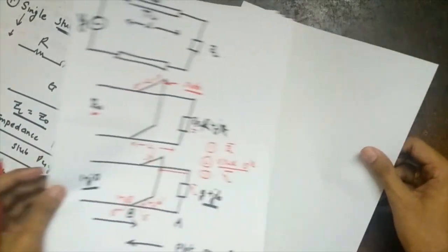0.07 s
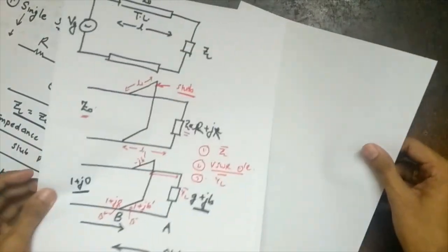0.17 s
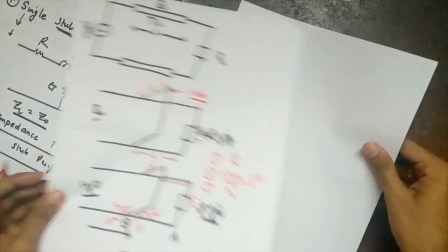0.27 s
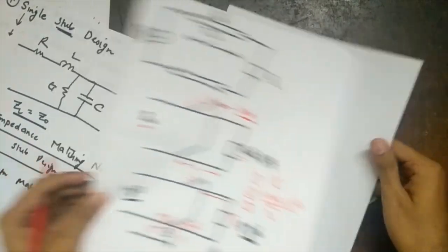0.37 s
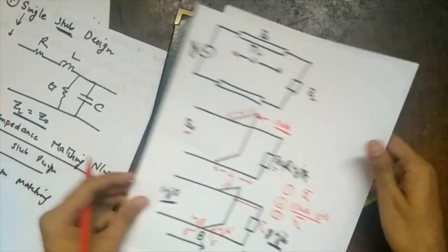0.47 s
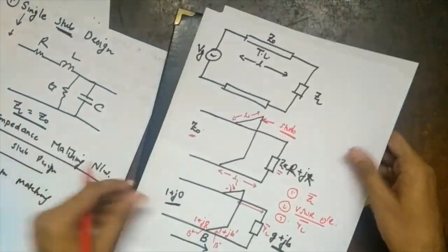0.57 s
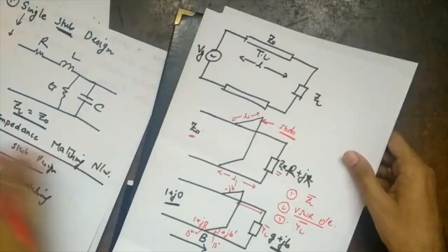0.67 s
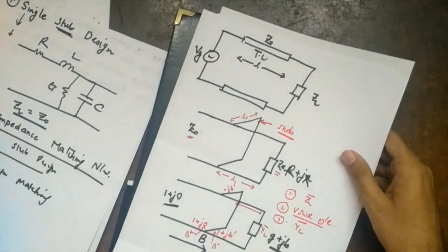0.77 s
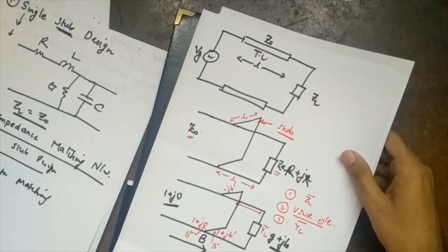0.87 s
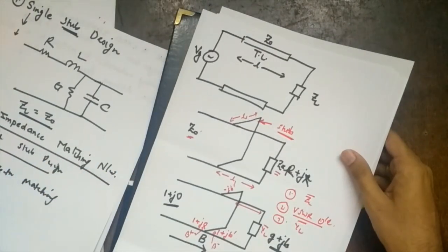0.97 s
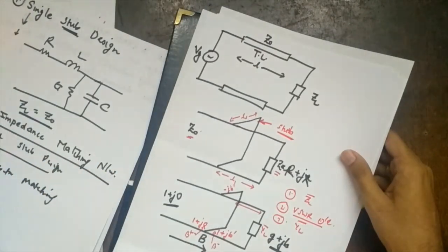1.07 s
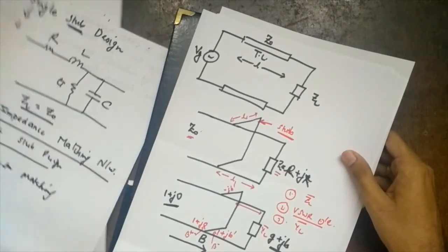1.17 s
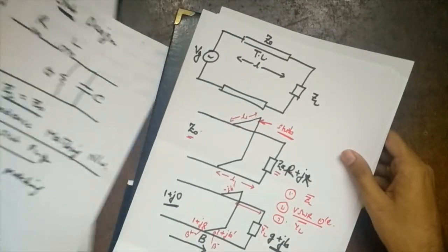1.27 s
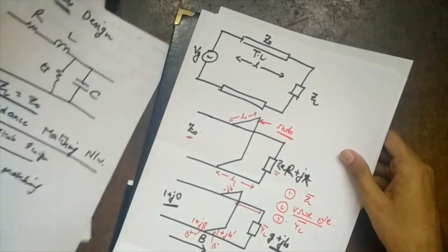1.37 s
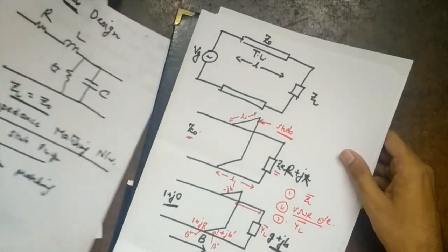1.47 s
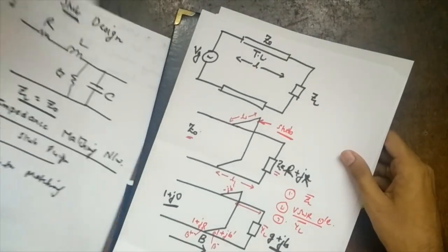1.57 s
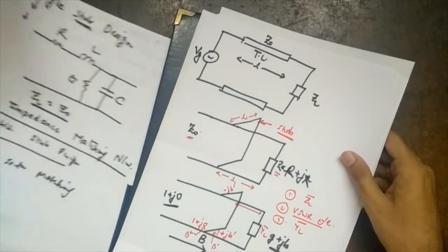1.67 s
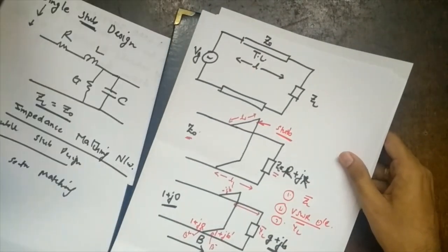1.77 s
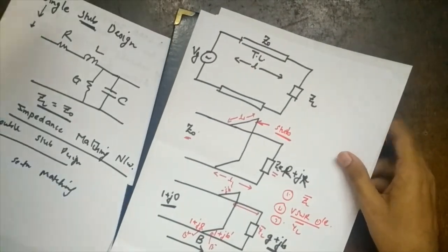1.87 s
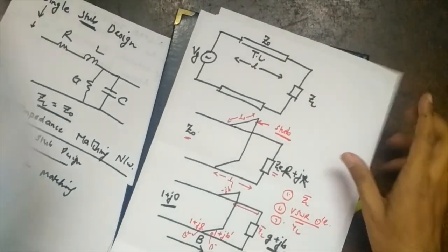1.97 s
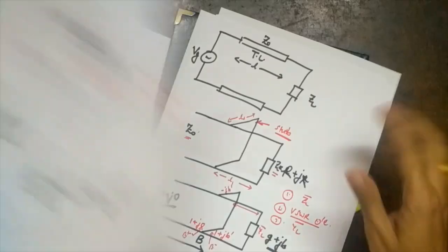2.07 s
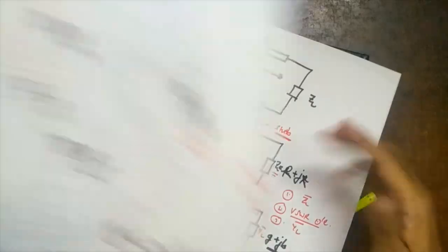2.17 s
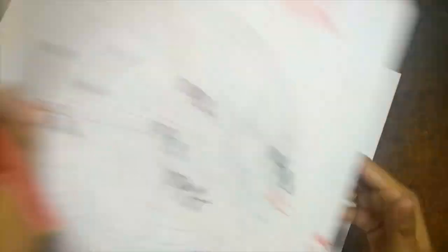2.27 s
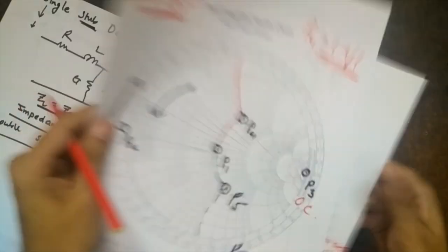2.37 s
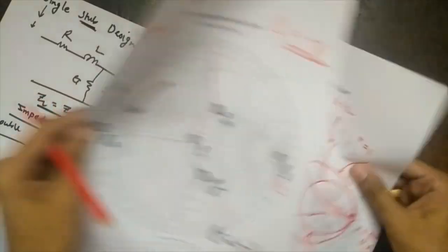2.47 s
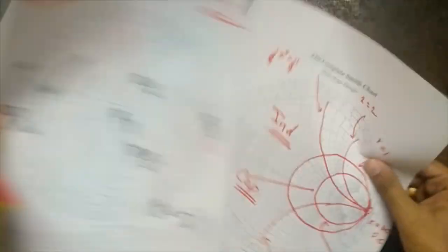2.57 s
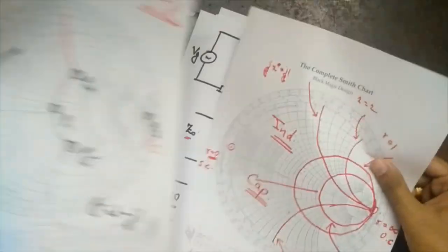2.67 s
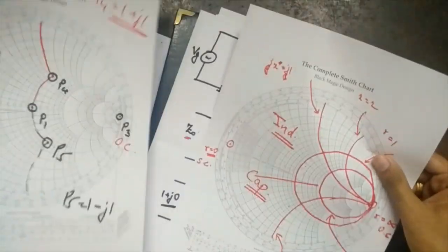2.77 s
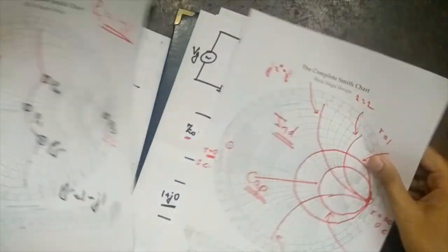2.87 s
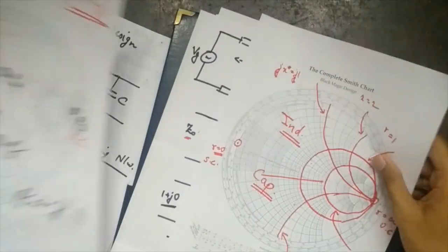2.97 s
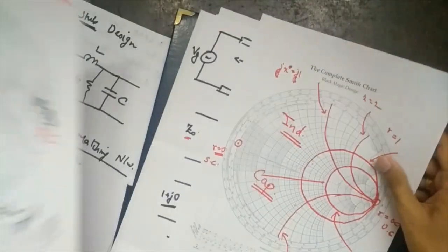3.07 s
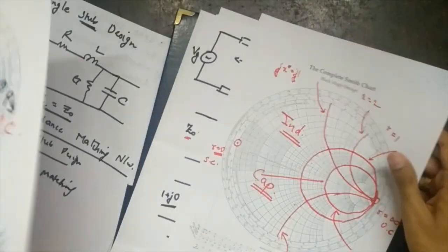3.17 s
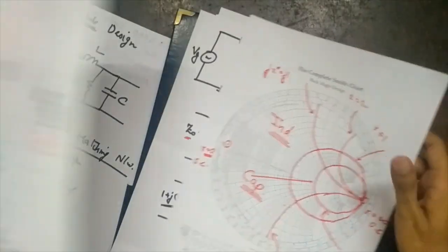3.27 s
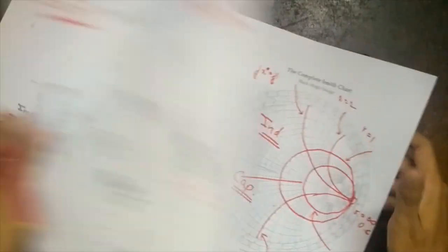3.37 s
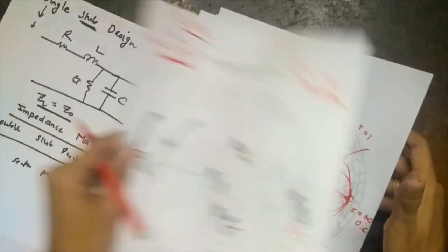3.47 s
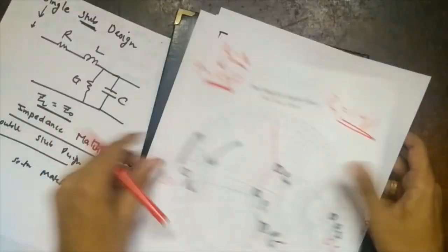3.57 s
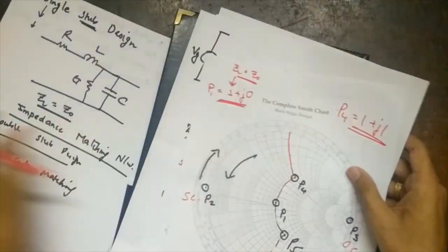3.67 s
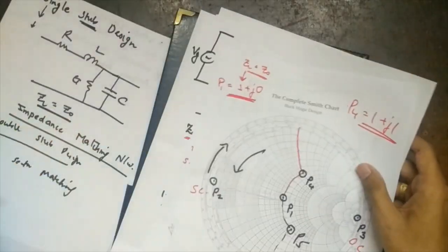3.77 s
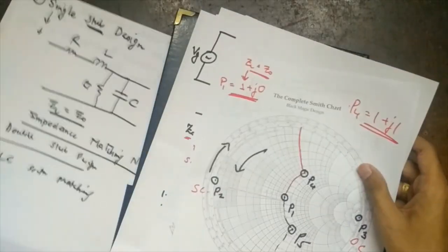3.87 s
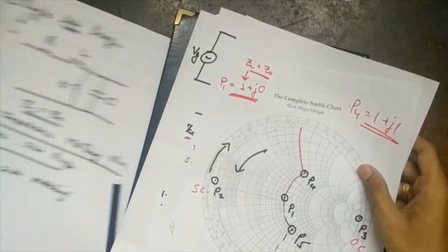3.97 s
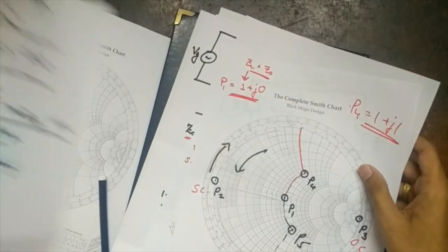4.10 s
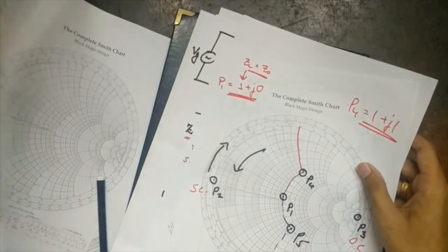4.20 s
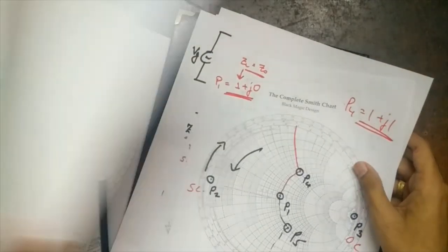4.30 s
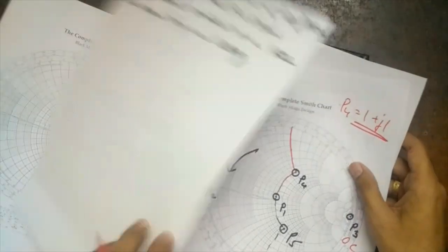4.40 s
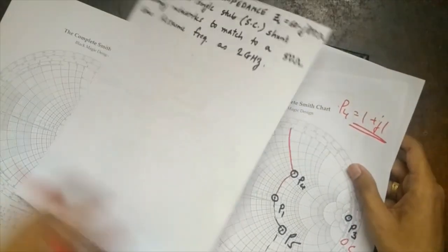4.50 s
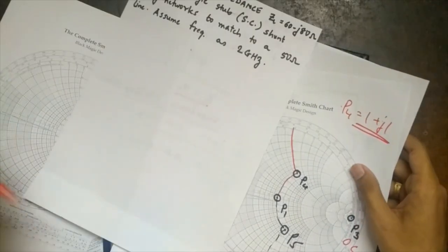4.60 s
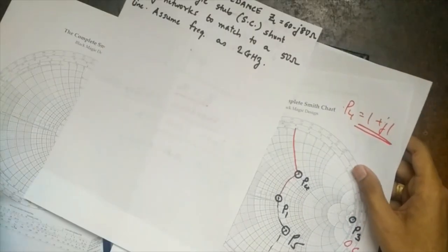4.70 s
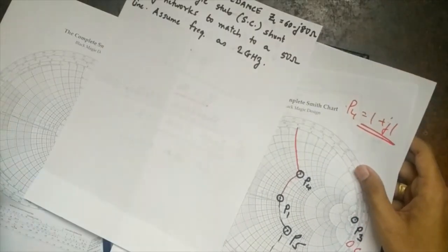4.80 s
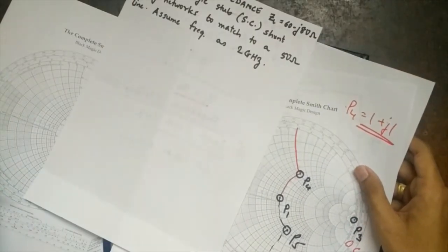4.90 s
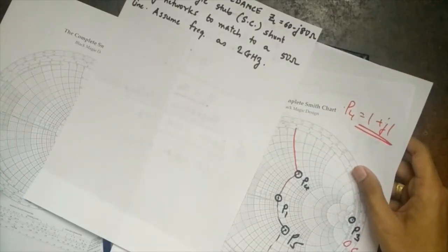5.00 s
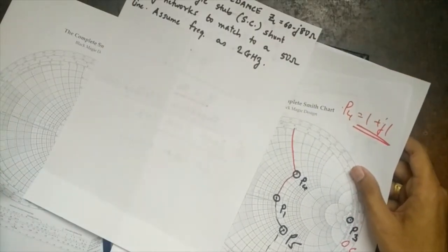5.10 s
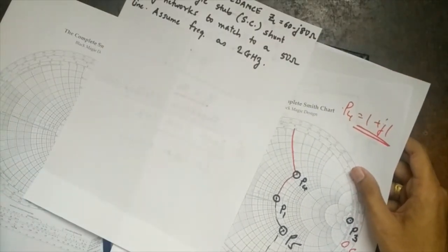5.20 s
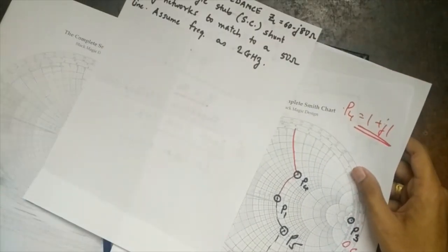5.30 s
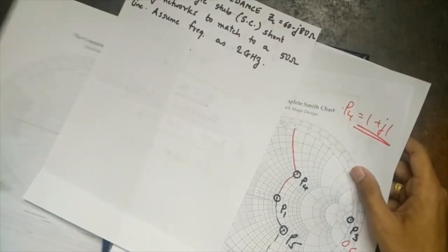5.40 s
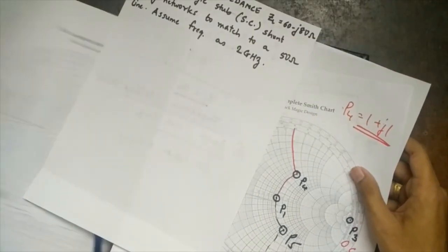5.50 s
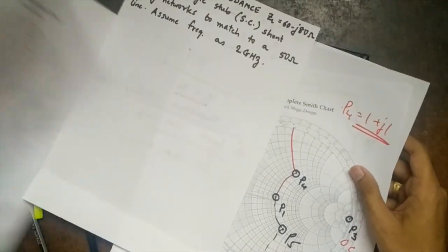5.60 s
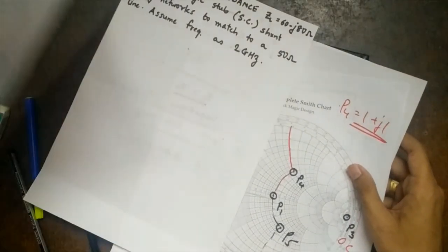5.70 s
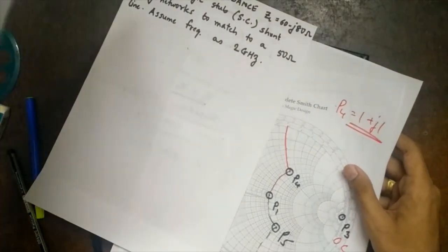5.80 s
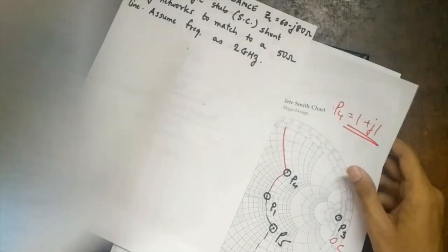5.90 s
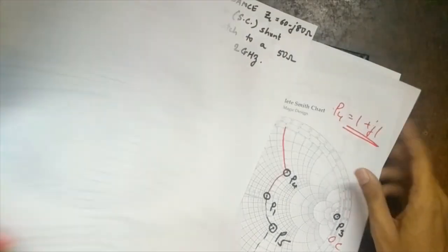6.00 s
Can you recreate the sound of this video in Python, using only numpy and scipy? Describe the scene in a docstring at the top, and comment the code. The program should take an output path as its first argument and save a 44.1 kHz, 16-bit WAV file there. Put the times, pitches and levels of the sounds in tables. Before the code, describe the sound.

Sheets of paper slide off a stack in a string of short, bright, hissing swishes, with small crisp snaps as they buckle. Near the middle a sheet flaps as it is turned over, and fingertips rasp faintly on the paper. A sharper pop follows later, then a soft thump on the desk amid more sliding. One close microphone hears it in a small quiet room with faint background noise.

```python
"""Sheets of paper slide off a stack, are turned over and are laid on a desk in a small quiet room.
Sliding friction, the sum of countless slips of fibres, gives a hiss that brightens with speed.
Buckling paper snaps and pops, a swung sheet flaps, and fingertips rasp by stick and slip.
The desk thumps softly twice, faintly early on and louder near the end.
One close microphone hears it all over faint room noise."""
import sys
import numpy as np
from scipy import signal
from scipy.fft import rfft, irfft
from scipy.io import wavfile
from scipy.ndimage import uniform_filter1d

SR = 44100
rng = np.random.default_rng(int(sys.argv[2]) if len(sys.argv) > 2 else 0)


def put_to_file(sound):
    """Save the sound as 16-bit audio at rate SR, in the file named by the first command-line argument."""
    columns = np.atleast_2d(sound).T  # one column per channel
    safe = np.clip(columns, -1, 1)
    whole_steps = np.round(safe * 32767)
    wavfile.write(sys.argv[1], SR, whole_steps.astype(np.int16))


N = 266805
TIME = np.arange(N) / SR


def sliding(judder_db=1.34):
    """Sliding friction radiates broadband noise: one band at low speed, the top treble too when fast."""
    # Spectra of the four parts of the friction noise: frequency_hz, relative_db
    hiss_spectrum = [(1500, -43), (2600, -43), (3300, -12), (4150, -10.5), (4750, -12), (5250, 1),
                     (5750, 0), (6600, -2.5), (7500, -6.5), (8200, -14), (9500, -14.5), (11000, -31),
                     (12500, -27.5), (15000, -36)]
    sizzle_spectrum = [(3000, -21), (5000, -8), (6300, -11), (7500, 3.5), (8600, 3.5), (9500, 1),
                       (11000, -3.5), (14000, -28)]
    treble_spectrum = [(6000, -19), (9000, -6), (9700, 1), (11300, -2.5), (12500, -4.5), (14000, -7),
                       (16000, -7)]
    rustle_spectrum = [(60, -35), (250, -16.5), (800, -17.5), (1300, 1.5), (1900, -1), (2500, 2),
                       (3100, 5.5), (4100, 1.5), (4750, -11.5), (8000, -25.5)]
    hiss_level, sizzle_level, treble_level, rustle_level = strokes()
    grain = flicker(fibres(per_s=2200, share=0.18), depth_db=3, patch_hz=200, patch_s=0.087)
    fine = flicker(fibres(per_s=5500, share=0.2, spread_db=-1.5), depth_db=4, patch_hz=220, patch_s=0.031)
    crackle = flicker(fibres(per_s=1700, share=0.45), depth_db=7.5, patch_hz=250, patch_s=0.04)
    fizz = flicker(rng.standard_normal(N), depth_db=3, patch_hz=220, patch_s=0.045)
    hiss = amp(-1.5) * hiss_level * colour(grain, hiss_spectrum)
    sizzle = amp(-0.5) * sizzle_level * colour(fizz, sizzle_spectrum)
    treble = amp(-0.5) * treble_level * colour(fine, treble_spectrum)
    rustle = amp(-8) * rustle_level * colour(crackle, rustle_spectrum)
    return amp(judder_db * wander(36.65)) * (hiss + sizzle + treble + rustle)


def strokes(sag_db_per_s=17, coast_db=27, treble_exponent=1.375, rustle_exponent=0.89):
    """Friction noise follows power laws of speed; overlapping strokes are incoherent and add in power."""
    # Sheet strokes, plus faint hiss in the pauses; treble and rustle are relative to the hiss:
    # start_s, rise_s, glide_s, coast_s, hiss_db, treble_db, rustle_db
    hisses = [(0, 0.0017, 0.058, 0.38, -44.5, -0.5, -15), (.215, .012, .003, .1, -51, -10, -17),
              (0.295, .034, .002, 0.08, -52.5, -11.5, -2.5), (.37, 0.052, 0.042, .05, -51, -13, -1),
              (.452, 0.058, 0.036, 0.18, -44.5, -2, -4), (.7, .05, 0.28, .1, -92, -11, 4),
              (1.006, 0.051, 0.022, 0.19, -63, 4.5, 4), (1.124, .008, .008, 0.35, -50, -19, -8),
              (1.245, 0.032, 0.019, .14, -57.5, 3.5, 1.5), (1.35, .044, .004, 0.057, -53.5, -1.5, -1.5),
              (1.407, 0.032, .025, 0.28, -52, -1, -9), (1.625, 0.089, 0.025, 0.041, -55.5, 5, -4.5),
              (1.705, 0.082, 0.13, 0.2, -53, 6, -29), (1.778, 0.062, .05, 0.15, -44.5, -5, 3.5),
              (2.187, 0.043, .027, .07, -78, 1.5, -6), (2.388, 0.024, .065, .13, -60.5, -1, 1.5),
              (2.452, 0.049, 0.071, 0.18, -46.5, -.5, 2.5), (2.633, 0.027, .02, 0.1, -49, 4.5, -22),
              (2.697, 0.01, 0.043, .15, -52.5, -0.5, -15), (2.924, 0.046, 0.074, 0.13, -56.5, -1.5, -4),
              (3.102, 0.0073, 0.0066, .09, -56.5, 2.5, -3), (3.28, 0.052, .01, 0.31, -53, -36, -5),
              (3.327, .066, 0.057, 0.25, -55.5, -8, -15), (3.561, .016, 0.01, 0.25, -54.5, -10, 0),
              (3.707, 0.028, .007, .07, -64, -11, -5), (3.824, 0.041, .01, 0.12, -58, -3.5, 1.5),
              (3.915, .035, .014, 0.073, -56.5, 8.5, -24), (3.974, 0.019, .12, .055, -64.5, 8.5, 3.5),
              (4.06, 0.075, 0.093, 0.078, -61.5, 11.5, -0.5), (4.26, .04, 0.15, .05, -82, -0.5, 10),
              (4.412, .016, 0.032, 0.16, -45.5, -13.5, 3), (4.539, 0.012, 0.055, 0.093, -58, 3.5, 6.5),
              (4.812, 0.01, .012, 0.15, -75.5, 7, 10.5), (4.848, .028, .2, .34, -84.5, -2, 12),
              (5.105, 0.033, 0.037, 0.088, -63, -0.5, 4.5), (5.248, 0.018, .002, 0.18, -64.5, 4, 11),
              (5.362, 0.035, 0.074, 0.13, -50, -4, -1), (5.463, 0.071, 0.073, 0.099, -52.5, -0.5, -15),
              (5.551, 0.077, 0.093, 0.12, -44.5, 0.5, -3.5), (5.885, .045, 0.011, 0.27, -65.5, -7, 3)]
    power, t = np.zeros((4, N)), np.arange(SR) / SR
    for start_s, rise_s, glide_s, coast_s, hiss_db, treble_db, rustle_db in hisses:
        gliding = np.clip(t - rise_s, 0, glide_s)
        coasting = np.maximum(t - rise_s - glide_s, 0)
        speed = swell(t, rise_s) * amp(-sag_db_per_s * gliding - coast_db * coasting / coast_s)
        treble = amp(treble_db) * speed ** treble_exponent  # a slowing sheet dulls
        sizzle = np.minimum(treble, speed)
        rustle = amp(rustle_db) * speed ** rustle_exponent
        for total, envelope in zip(power, (speed, sizzle, treble, rustle)):
            add(total, start_s, (amp(hiss_db) * envelope) ** 2)
    return np.sqrt(power)


def fibres(per_s, share, spread_db=0):
    """Countless slips sum to Gaussian noise; single catches, a Poisson process, share its power."""
    size = amp(spread_db * np.minimum(rng.exponential(1, N), 4.5))
    catches = rng.choice([-1., 1.], N) * size * (rng.random(N) < per_s / SR)
    return np.sqrt(1 - share) * unit(rng.standard_normal(N)) + np.sqrt(share) * unit(catches)


def snapping(rise_s=0.0021, delay_at_1khz_s=0.00117, ring_ratio=1.42, ring_db=-6.5, decay_cycles=7.6):
    """Buckling gives an impulse and smaller slips; the size of the flipped patch sets band and ring."""
    # Paper buckles or an edge strikes: start_s, level_db, low_hz, high_hz, decay_s
    snaps = [(0.371, -25.5, 1970, 5100, .0018), (0.503, -41, 4500, 13400, .005),
             (0.746, -57.5, 2280, 3960, 0.0022), (1.046, -58, 1295, 5900, 0.0045),
             (1.1353, -35, 3520, 6700, 0.002), (1.271, -49, 1326, 2170, 0.0052),
             (1.553, -52.5, 4300, 7760, 0.002), (1.8542, -49, 1110, 3400, 0.0081),
             (2.1422, -61, 880, 1580, 0.00078), (2.207, -55, 880, 1500, 0.0031),
             (2.4688, -37.5, 404, 1620, 0.0011), (2.525, -42, 590, 3460, 0.003),
             (2.535, -32.5, 913, 3550, 0.0023), (2.640, -48, 4200, 11000, 0.0023),
             (2.795, -59, 1020, 1660, 0.0049), (2.943, -56.5, 3030, 9150, 0.0029),
             (3.292, -50, 1710, 4270, 0.0049), (3.5688, -48, 614, 2590, .006),
             (3.575, -37, 1130, 3230, 0.0017), (4.4178, -27, 2590, 5700, .0018),
             (4.5455, -39.5, 4540, 10600, 0.0048), (4.6838, -63.5, 1014, 3320, .006),
             (5.118, -58.5, 6550, 11000, 0.01), (5.275, -50, 6500, 14000, 0.0056),
             (5.367, -53, 1620, 9000, 0.0078), (5.3797, -39, 1990, 8500, 0.0044),
             (5.3887, -44.5, 2600, 7650, 0.011), (5.418, -46, 2620, 9600, 0.0051),
             (5.439, -48, 5570, 10100, .007), (5.779, -53.5, 1750, 5500, 0.0045),
             (6.004, -55.5, 850, 1690, 0.0018)]
    out, t, f = np.zeros(N), np.arange(2048) / SR, np.fft.rfftfreq(2048, 1 / SR)
    onset = 1 - np.exp(-t / rise_s)
    # Bending waves are dispersive: the treble arrives first.
    dispersion = np.exp(-4j * np.pi * delay_at_1khz_s * np.sqrt(1000 * f))
    for start_s, level_db, low_hz, high_hz, decay_s in snaps:
        force = 0.5 * rng.standard_normal(len(t)) * onset * np.exp(-t / decay_s)
        force[0] += 1.6  # the buckle itself
        band = signal.butter(2, [low_hz, high_hz], "bandpass", fs=SR, output="sos")
        ring_hz = ring_ratio * low_hz
        ring = np.sin(2 * np.pi * ring_hz * t) * np.exp(-t * ring_hz / decay_cycles) * onset
        vibration = unit(signal.sosfilt(band, force)) + amp(ring_db) * unit(ring)
        # A small patch of paper radiates no bass.
        radiation = signal.butter(3, 0.52 * low_hz, "highpass", fs=SR, output="sos")
        snap = irfft(rfft(signal.sosfilt(radiation, vibration)) * dispersion)
        add(out, start_s, amp(level_db) * snap * np.sqrt(2 * decay_s * SR / np.sum(snap ** 2)))
    return out


def popping():
    """Snap-through of a wide bulge excites its low, heavily damped modes: a hollow pop."""
    # Modes of the bulge: pitch_hz, relative_db, decay_s
    modes = [(525, -3.5, 0.002), (830, -5.5, 0.0011), (1220, 1.5, 0.0012), (2085, 4, .0012)]
    # The bulge flips over: start_s, level_db
    flips = [(1.134, -52.5), (2.535, -44.5), (3.576, -50.5), (4.4174, -31.5)]
    out, t = np.zeros(N), np.arange(2048) / SR
    pop = sum(amp(relative_db) * t / decay_s * np.exp(1 - t / decay_s) * np.sin(2 * np.pi * pitch_hz * t)
              for pitch_hz, relative_db, decay_s in modes)
    for start_s, level_db in flips:
        add(out, start_s, amp(level_db) * pop)
    return out


def flapping():
    """Flexure of a whole sheet swung through the air radiates a quick run of dull pops."""
    # Swings of the sheet: start_s, rise_s, decay_s, level_db
    flaps = [(2.462, 0.0082, 0.023, -37.5), (2.495, .045, 0.031, -42.5), (2.63, 0.035, 0.028, -60)]
    # Spectrum of the flexing sheet: frequency_hz, relative_db
    spectrum = [(35, -2), (60, -1), (140, -1.5), (240, -25), (400, -3), (560, 5.5), (900, 0.5),
                (1250, -4.5), (2000, -8), (3200, -11.5), (6000, -17)]
    flex = np.zeros(N)
    for start_s, rise_s, decay_s, level_db in flaps:
        t = TIME - start_s
        flex += amp(level_db) * swell(t, rise_s) * np.exp(-np.maximum(t - rise_s, 0) / decay_s)
    return flex * colour(fibres(per_s=1500, share=0.6, spread_db=3.5), spectrum)


def rubbing(gain_db=-3):
    """Irregular stick-slip of skin drives one broad resonance of the pressed sheet."""
    # Fingertips drag over paper: start_s, length_s, relative_db, centre_hz, width_hz
    rubs = [(1.266, 0.069, -58, 1750, 500), (2.288, 0.21, -68, 364, 150), (2.632, 0.019, -50.5, 1240, 289),
            (2.667, 0.072, -54, 1266, 198), (2.919, .21, -60.5, 557, 191), (2.952, 0.13, -63.5, 1190, 453),
            (5.671, 0.023, -46, 1264, 218), (5.695, 0.1, -58, 1450, 610), (5.816, 0.046, -58.5, 1150, 260),
            (5.87, 0.1, -57.5, 1230, 388)]
    out = np.zeros(N)
    for start_s, length_s, relative_db, centre_hz, width_hz in rubs:
        count = round(length_s * SR)
        f = np.fft.rfftfreq(count, 1 / SR)
        resonance = 1 / (1 + (2 * (f - centre_hz) / width_hz) ** 2)
        rasp = irfft(resonance * np.exp(2j * np.pi * rng.random(len(f))), count)
        add(out, start_s, amp(relative_db + gain_db) * unit(rasp * signal.windows.tukey(count, 0.6)))
    return out


def bumping():
    """Soft impacts excite damped vibrations of the desk top that swell and die in a few cycles."""
    # The desk under the hand: start_s, level_db, pitch_hz, peak_after_s
    bumps = [(1.119, -54, 95.4, 0.011), (5.374, -41.5, 108.4, 0.014), (5.391, -52.5, 224, 0.0085),
             (5.414, -49, 76, .012), (5.43, -54, 304, 0.01), (5.452, -50, 116, 0.013)]
    out, t = np.zeros(N), np.arange(SR // 4) / SR
    for start_s, level_db, pitch_hz, peak_after_s in bumps:
        age = t / peak_after_s
        envelope = age ** 2 * np.exp(2 * (1 - age))
        add(out, start_s, amp(level_db) * envelope * np.sin(2 * np.pi * pitch_hz * t))
    return out


def room(x, early_db, tail_db, first_s=0.0069, early_s=0.033, echoes_per_s=2500):
    """Reverberation by convolution: dense early reflections from near walls, then a faint diffuse tail."""
    # Time the room takes to decay by 60 dB: frequency_hz, t60_s
    decay_times = [(150, 0.48), (600, 0.58), (2000, 0.2), (5000, 0.19), (9000, 0.32), (15000, 0.66)]
    t = np.arange(SR // 2) / SR
    echoes = rng.choice([-1., 1.], len(t)) * (rng.random(len(t)) < echoes_per_s / SR) * (t > first_s)
    fade = np.exp(-t / early_s) * np.clip(3 - 2 * t / early_s, 0, 1)
    early = signal.lfilter(*signal.butter(1, 8000, fs=SR), echoes * fade)
    diffuse = rng.standard_normal(len(t)) * (t > 2 * first_s)
    hz, frame_s, spectra = signal.stft(diffuse, SR, nperseg=256)
    decay = amp(-60 * frame_s / read(decay_times, hz)[:, None])
    tail = signal.istft(spectra * decay, SR, nperseg=256)[1][:len(t)]
    response = (amp(early_db) * unit(early) + amp(tail_db) * unit(tail)) / np.sqrt(len(t))
    return x + signal.fftconvolve(x, response)[:N]


def background(noise_db=-69, swell_db=0.45, waver_hz=3.32):
    """Slow random modulation makes the room noise swell gently and a few faint tones waver."""
    # Tones in the room: pitch_hz, level_db
    tones = [(120, -79), (565, -81), (759, -89.5), (856, -100)]
    # Spectrum of the room noise: frequency_hz, relative_db
    spectrum = [(20, -22), (35, -20), (55, 1), (125, -11), (170, -6), (400, -4), (600, -5), (850, -9.5),
                (1100, -16.5), (2000, -18.5), (3500, -26.5), (6400, -26.5), (11000, -33), (15000, -65)]
    hum = np.zeros(N)
    for pitch_hz, level_db in tones:
        amplitude = np.sqrt(2) * amp(level_db + 2 * wander(4.1))
        cycles = np.cumsum(pitch_hz + waver_hz * wander(11.3)) / SR
        hum += amplitude * np.sin(2 * np.pi * cycles)
    noise = flicker(rng.standard_normal(N), depth_db=3, patch_hz=250, patch_s=0.08)
    return amp(noise_db + swell_db * wander(7.6)) * colour(noise, spectrum) + hum


def flicker(x, depth_db, patch_hz, patch_s):
    """Spectral modulation: random patches of level across time and frequency make noise blotchy."""
    spectra = signal.stft(x, nperseg=512)[2]
    bins, frames = round(patch_hz * 512 / SR), round(patch_s * SR / 256)
    patches = uniform_filter1d(rng.standard_normal(spectra.shape), bins, axis=0)
    patches = unit(uniform_filter1d(patches, frames, axis=1))
    return unit(signal.istft(spectra * amp(depth_db * patches), nperseg=512)[1][:N])


def colour(x, spectrum):
    """Filters x by a tabulated spectrum, at rms 1."""
    return unit(irfft(rfft(x) * amp(read(spectrum, np.fft.rfftfreq(N, 1 / SR))), N))


def wander(rate_hz):
    """Low-pass noise of rms 1, fluctuating up to about this rate."""
    lowpass = 1 / (1 + (np.fft.rfftfreq(N, 1 / SR) / rate_hz) ** 4)
    return unit(irfft(rfft(rng.standard_normal(N)) * lowpass, N))


def swell(t, rise_s):
    """A raised-cosine rise from 0 to 1."""
    return np.sin(np.pi / 2 * np.clip(t / rise_s, 0, 1)) ** 2


def read(points, hz):
    """Interpolates a table along log frequency."""
    f, value = np.transpose(points)
    return np.interp(np.log(hz + 1), np.log(f + 1), value)


def amp(db):
    """Decibels to amplitude ratio."""
    return 10 ** (np.asarray(db) / 20)


def unit(x):
    """Scales to rms 1."""
    return x / np.sqrt(np.mean(x ** 2) + 1e-20)


def add(mix, start_s, sound):
    """Superposes a sound on the mix."""
    part = mix[max(round(start_s * SR), 0):][:len(sound)]
    part += sound[:len(part)]


def scene():
    """Superposition of paper, desk and room noise at one point, the same in both channels."""
    paper = room(sliding() + flapping() + rubbing(), early_db=-16.5, tail_db=-24)
    buckles = room(snapping() + popping(), early_db=-11, tail_db=-15.5)
    return np.tile(paper + buckles + bumping() + background(), (2, 1))


def record(dry, cutoff_hz=15850):
    """Band limiting: a steep low-pass filter removes the highest treble."""
    lowpass = signal.firwin(511, cutoff_hz, window=("kaiser", 9), fs=SR)
    return signal.oaconvolve(dry, lowpass[None], "same")


dry = scene()
out = record(dry)
put_to_file(out)
```